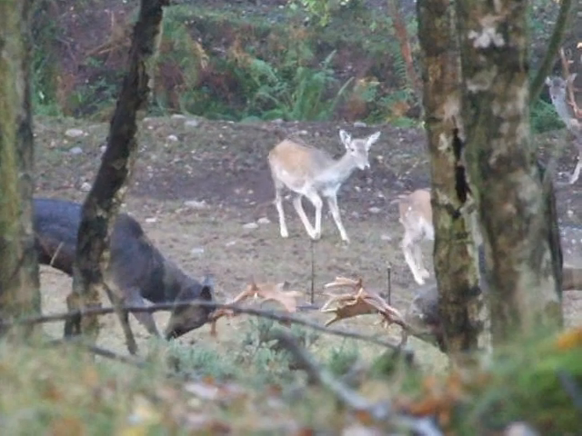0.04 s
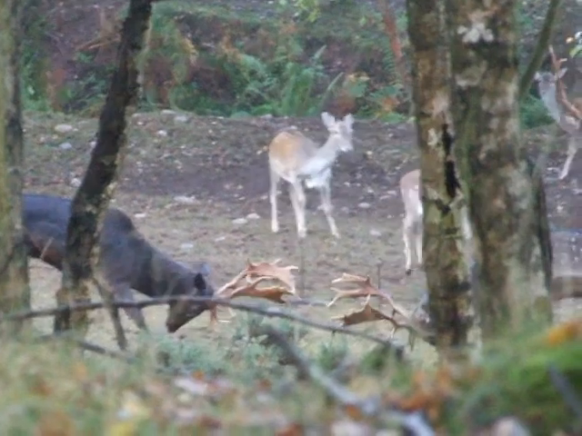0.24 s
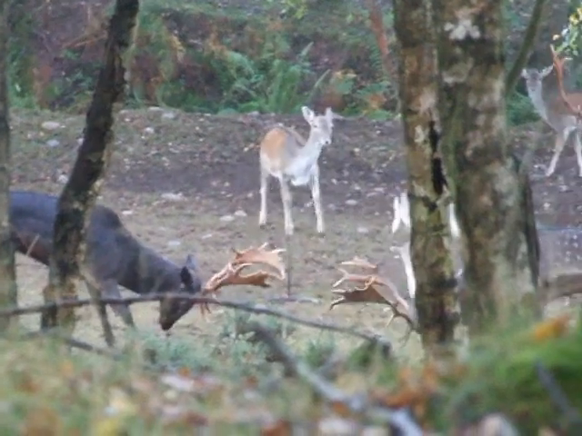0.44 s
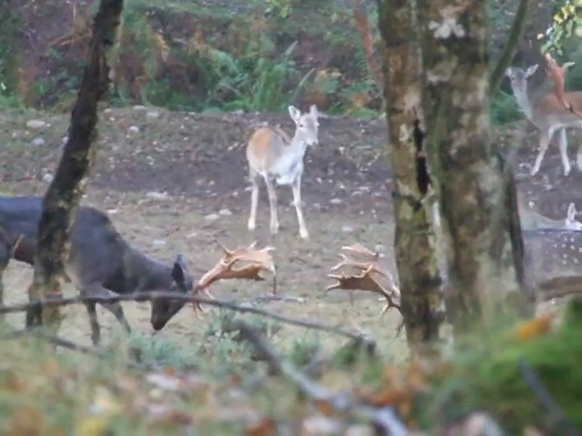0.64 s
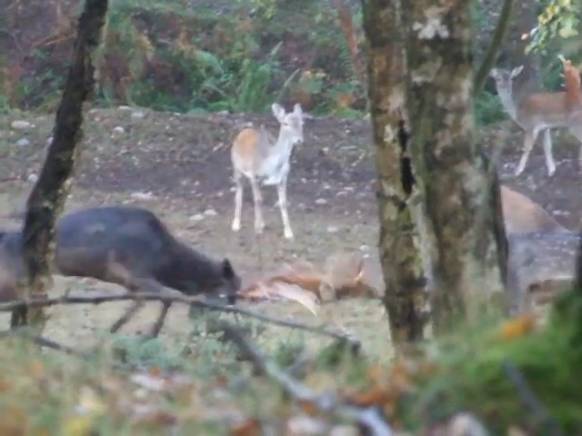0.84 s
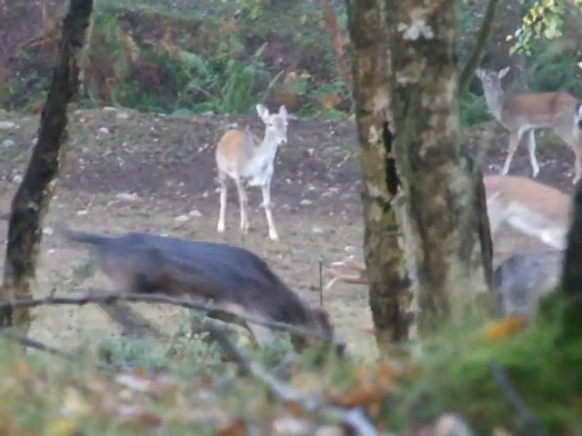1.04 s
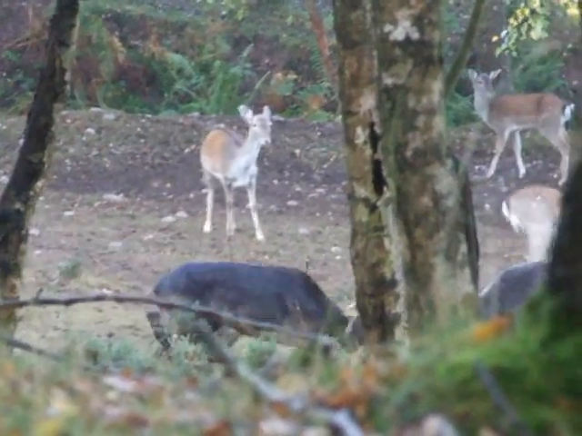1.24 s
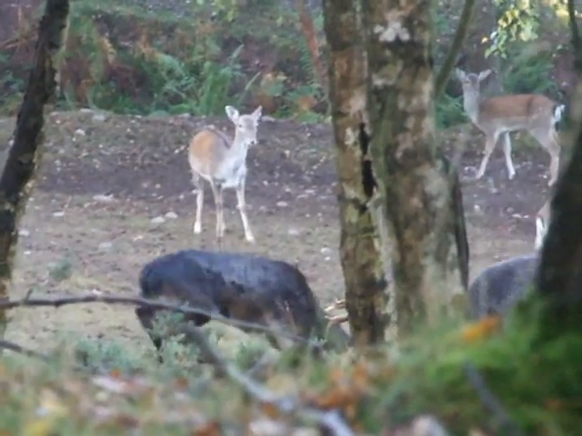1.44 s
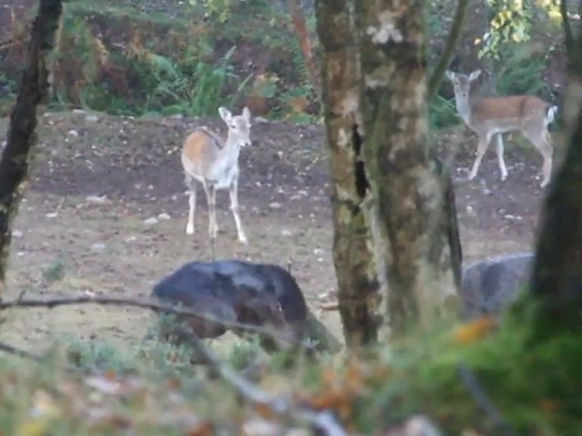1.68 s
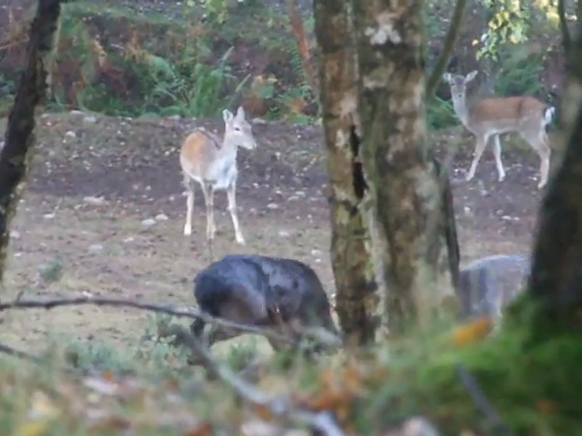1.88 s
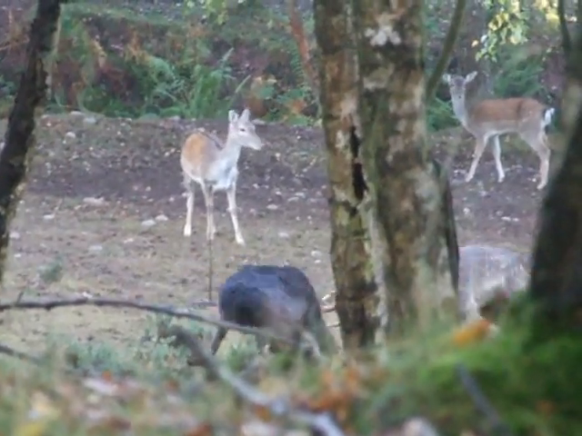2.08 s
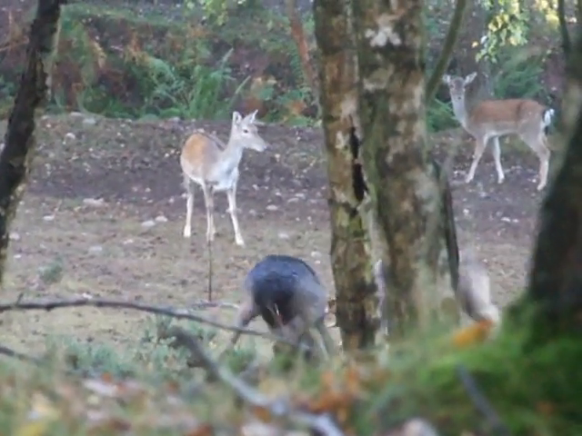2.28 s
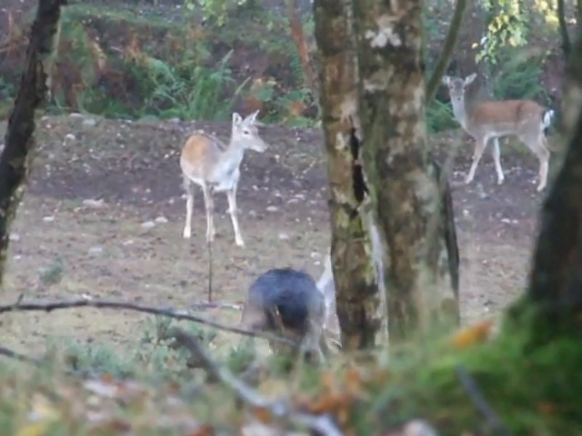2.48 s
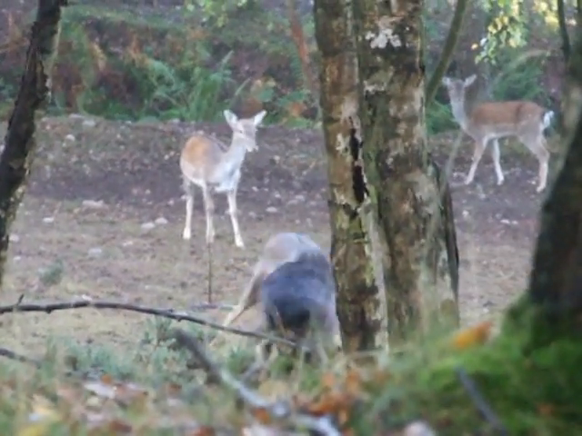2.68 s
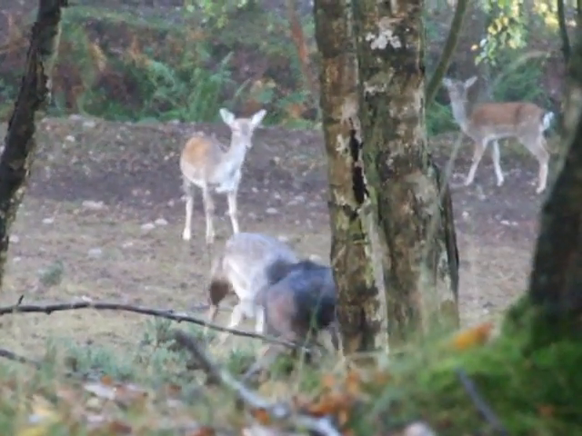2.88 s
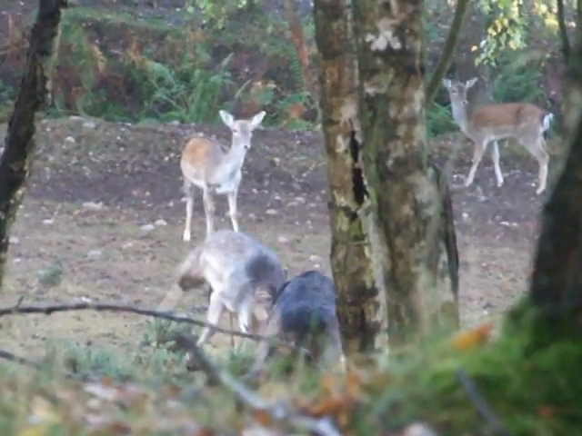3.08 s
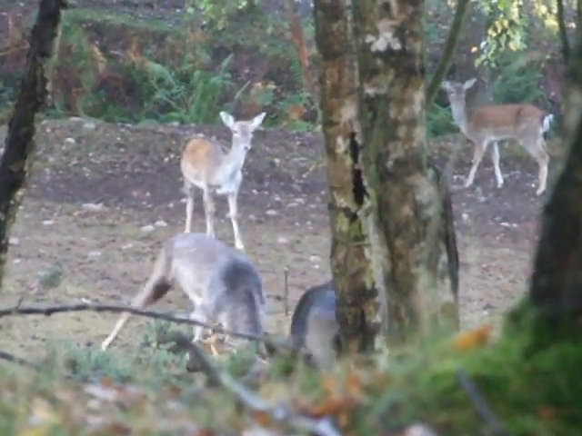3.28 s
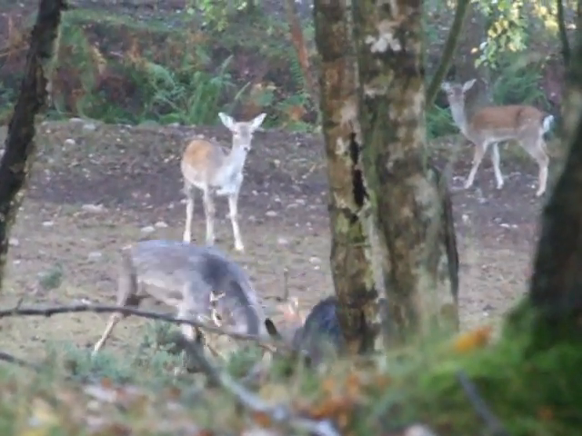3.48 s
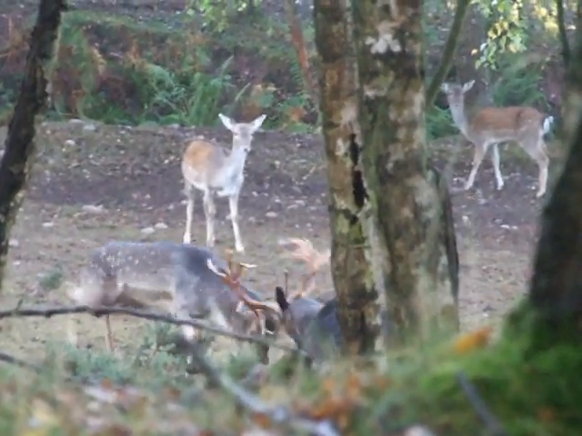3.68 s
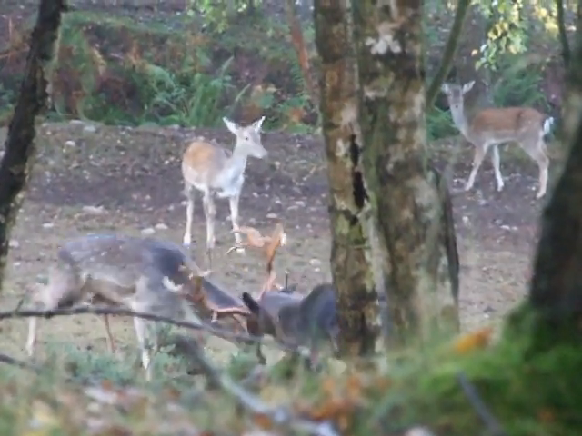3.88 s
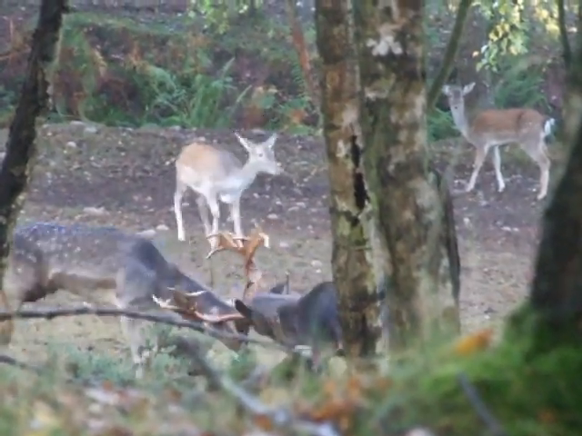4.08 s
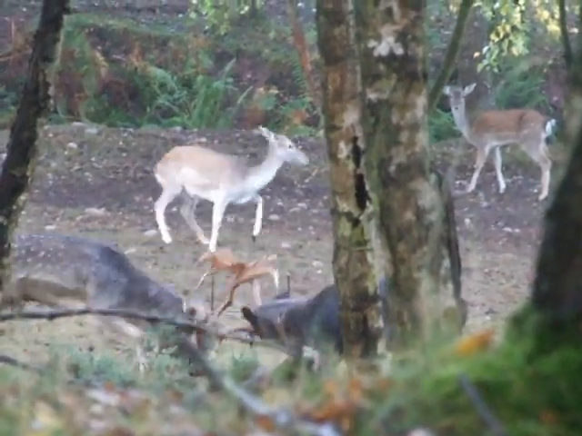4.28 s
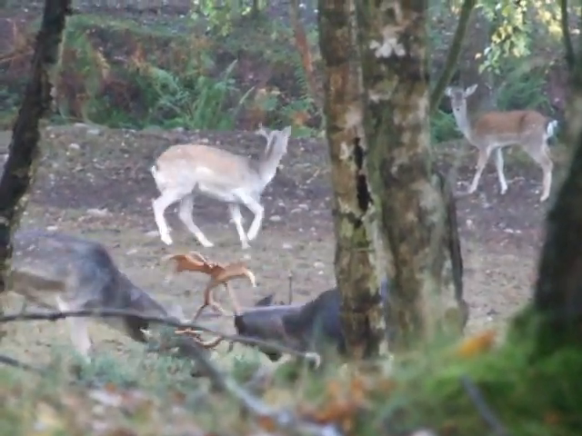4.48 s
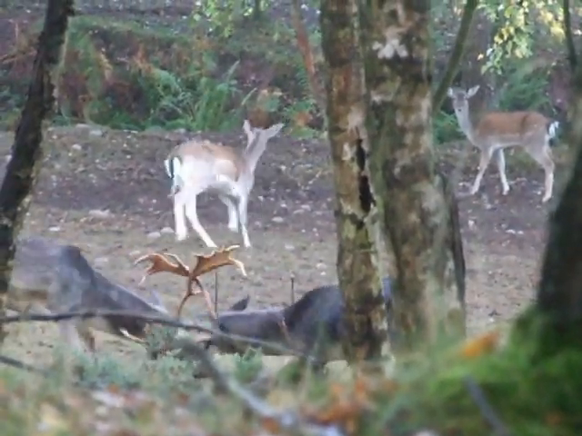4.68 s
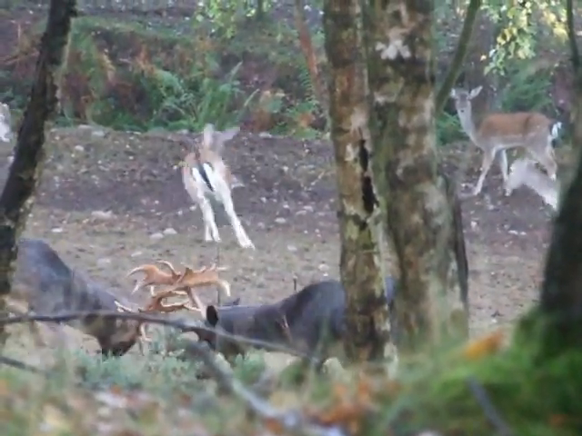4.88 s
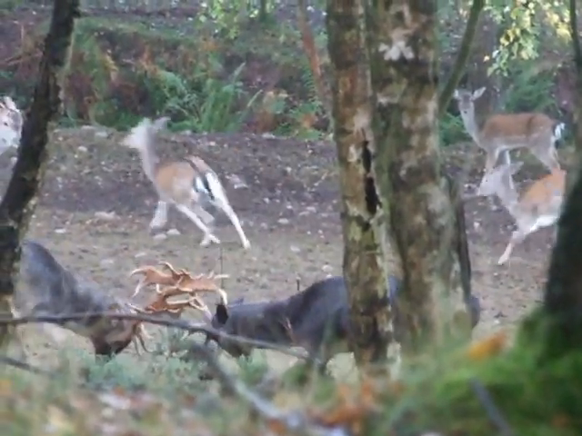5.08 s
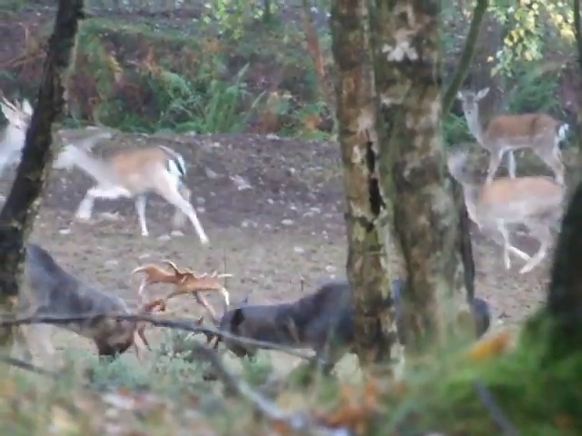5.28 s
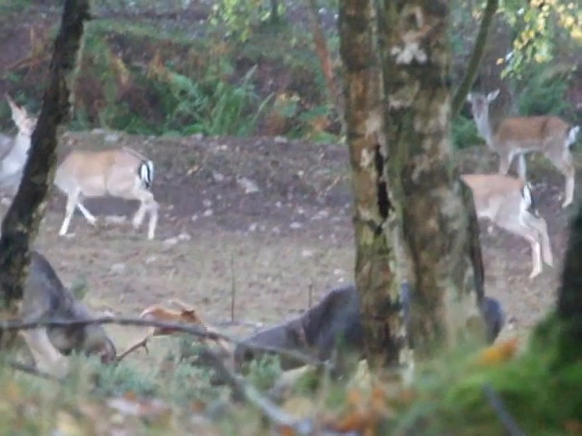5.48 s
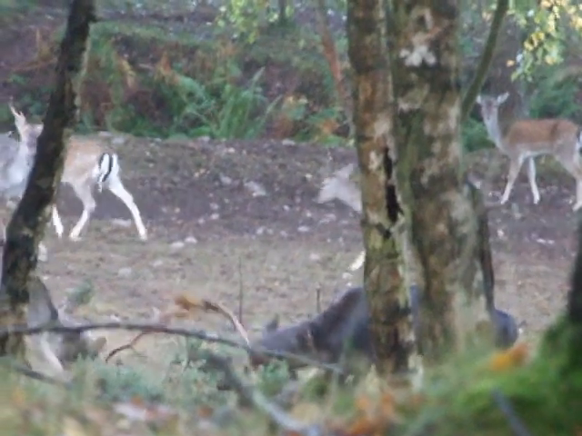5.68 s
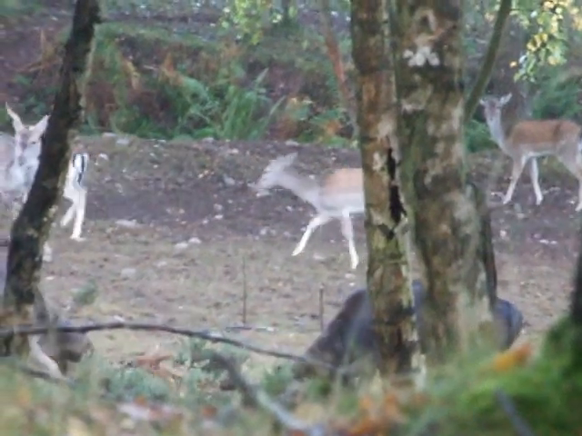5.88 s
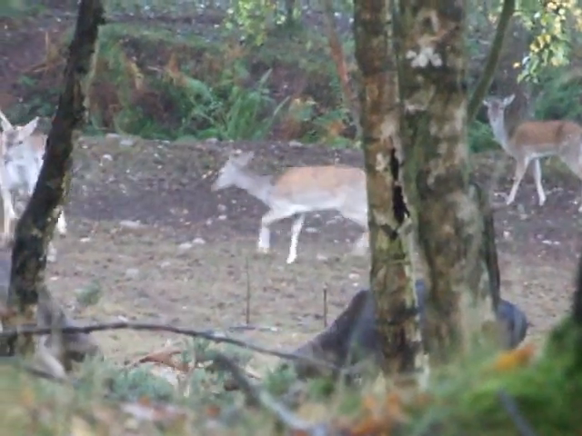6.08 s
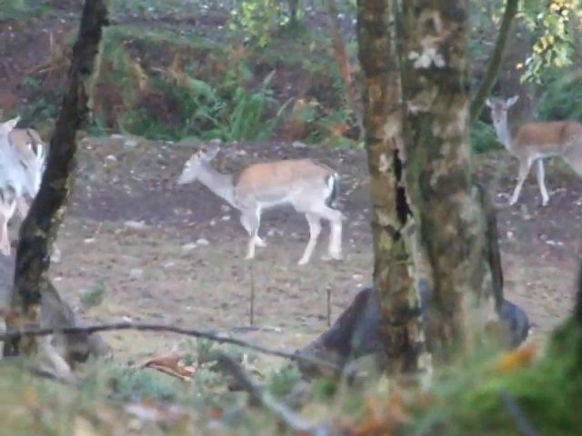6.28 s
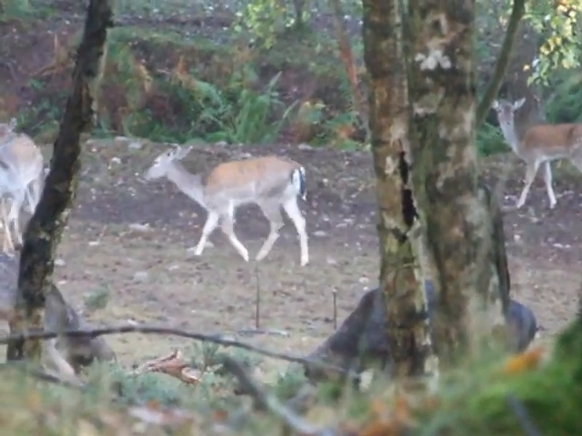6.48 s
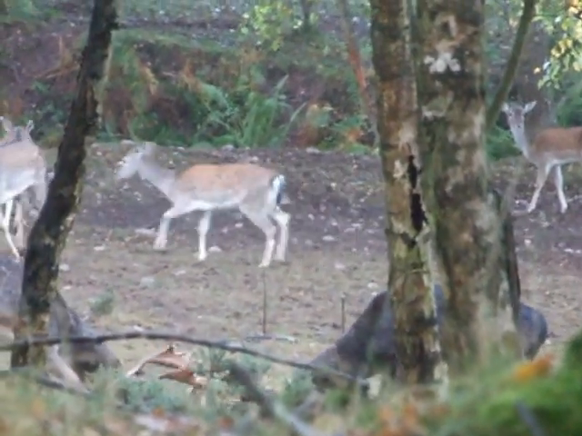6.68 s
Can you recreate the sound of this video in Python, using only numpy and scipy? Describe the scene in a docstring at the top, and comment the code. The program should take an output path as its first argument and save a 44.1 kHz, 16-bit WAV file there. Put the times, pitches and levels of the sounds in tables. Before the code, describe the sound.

Antlers of two fighting deer clack and clatter irregularly, with low rattling grunts and scuffing hooves, at the edge of a wood.

```python
"""Fallow bucks fighting

Two bucks fight some way off at a wood's edge. Antlers clack, skid and lock; trunks scatter each clash.
Between blows, slack vocal folds give low rattling grunts, so slow that single pulses are heard.
Hooves scuff dry ground and snap twigs, a small bird calls thinly, and the air hisses softly."""
import sys
import numpy as np
from scipy import signal
from scipy.fft import rfft, irfft, next_fast_len
from scipy.io import wavfile
from scipy.ndimage import map_coordinates

SR = 44100
rng = np.random.default_rng(int(sys.argv[2]) if len(sys.argv) > 2 else 0)


def bounce(signal):
    """Save signal as a 16-bit WAV file at the path given by the first command-line argument."""
    frames = np.transpose(np.atleast_2d(signal))
    limited = np.clip(frames, -1, 1)
    pcm = np.round(limited * 32767).astype(np.int16)
    wavfile.write(sys.argv[1], SR, pcm)


N = 297234

# Air spectrum: freq_hz, gain_db
AIR_SPECTRUM = [(20, -7.5), (35, -10), (70, 0.5), (130, -5), (240, -6.5), (350, -11), (650, -7.5),
                (1300, -11), (2100, -14), (3100, -16.5), (4500, -14), (7400, -17.5), (10200, -40.5)]
# Hoof scuffing envelope: time_s, gain_db
SCUFF_ENVELOPE = [(0.0, -36.5), (1.05, -62), (1.2, -32), (1.93, -37), (5.2, -44.5), (5.78, -28.5),
                  (6.03, -38.5), (6.74, -38)]
# Dry litter spectrum: freq_hz, gain_db
LITTER_SPECTRUM = [(300, -16), (1000, -4), (2200, -4.5), (3500, -7), (6000, -6.5), (8000, -17.5),
                   (10000, -33)]
# Bird calls: start_s, length_s, pitch_hz, gain_db
PEEPS = [(.12, 0.16, 4100, -64), (0.528, 0.34, 4570, -62.5), (0.688, 0.093, 4400, -58),
         (2.864, 0.39, 4500, -62), (5.422, 0.26, 4480, -55)]
# Decay of the wood's echo: freq_hz, t60_s
WOOD_DECAY = [(200, 0.25), (900, 0.75), (2100, 0.64), (5500, 0.61), (9000, 0.4)]
# Antler contacts: start_s, level_db (over 10 ms), tine_hz, depth (0 tip, 1 base), echo_db
CLASHES = [(0.2798, -27.5, 4280, 0.46, 2.5), (1.0103, -32.5, 6570, 0.43, 3.5), (1.065, -33.5, 4330, .6, -4),
           (1.078, -29, 6440, 0, 6), (1.0998, -28, 6200, 0.94, -6), (1.111, -26.5, 5650, 0.68, -3),
           (1.1211, -25.5, 5320, 0.46, 1), (1.3453, -34, 4970, 1, -5), (1.58, -30.5, 4380, 0.58, -3.5),
           (1.7863, -25, 6224, 0.63, -0.5), (2.431, -37.5, 7000, 0.079, -12), (2.454, -37.5, 4340, 0, -5.5),
           (2.49, -38.5, 4300, .2, -3), (2.627, -32.5, 4848, 0.88, 1), (3.157, -40, 4500, 1, -6),
           (3.3253, -37, 3900, 0.69, 8), (3.3597, -26, 6000, 0.45, -13), (3.375, -29.5, 5440, 0.99, -1.5),
           (3.392, -34, 5860, 1, -2.5), (3.581, -38.5, 4670, 0, -14), (3.756, -34, 6594, 0.36, 1),
           (4.006, -39, 5170, 0.015, -5), (4.2559, -31, 4250, 0.66, -5.5), (4.46, -41.5, 5220, .4, 3.5),
           (4.7504, -34, 4302, 0.49, -4.5), (5.402, -23, 6190, 0.29, -3), (5.6313, -29.5, 5900, 0.52, -3.5),
           (5.7697, -36, 5254, .4, 1.5), (5.8064, -22.5, 6210, 0, -1), (6.2372, -29.5, 5950, 0.047, -3.5),
           (6.3646, -35.5, 6125, 0.48, 0), (6.406, -34, 5888, 0.11, -11)]
# Bare contact spectrum: freq_hz, gain_db
CRACK_SPECTRUM = [(100, -35), (330, -5.5), (800, -26), (1500, -10), (3200, -9.5), (6500, -2), (8000, -16.5),
                  (10000, -23)]
# Resonances of the antlers' broad palms: centre_hz, width_hz, gain_db
PALM_MODES = [(1795, 70, 5.5), (2255, 46, 0), (2830, 91, 2), (3660, 240, -2.5), (4250, 220, 1.5),
              (5800, 1700, -2.5), (6560, 210, -6.5), (7750, 280, -20)]
# Grunts: start_s, length_s, gain_db, mouth_db (opening), mouth_hz (resonance)
GRUNTS = [(0.776, 0.21, -45, -2, 1790), (1.311, 0.24, -40, 0, 1150), (1.619, 0.15, -45.5, -9, 1170),
          (2.422, 0.3, -38.5, -1, 1150), (3.555, 0.14, -46, -8, 1156), (3.749, 0.21, -47.5, 1.5, 1195),
          (4.301, 0.29, -39.5, -4.5, 1149), (4.992, 0.38, -40.5, -1, 1151), (5.617, 0.21, -44.5, -1, 1136),
          (5.872, 0.17, -44, 3.5, 1170), (6.251, 0.25, -43.5, -1, 1087), (6.49, 0.21, -42, -1, 1090)]
# Hard pops in the rattle: start_s, level_db (over 10 ms)
POPS = [(1.3798, -33.5), (1.4635, -34), (1.4954, -33.5), (2.5556, -34.5), (5.1558, -36), (5.2073, -34.5),
        (5.2952, -38.5), (6.0154, -36), (6.0401, -36)]
# Low throat resonances: centre_hz, width_hz, gain_db
THROAT_MODES = [(166, 98, -5.5), (236.4, 49.3, 1.5), (419.4, 73, -9), (664, 112, -15.5)]
# High, open-mouth resonances: centre_hz, width_hz, gain_db
MOUTH_MODES = [(1390, 280, -5.5), (2023, 206, -2.5), (2530, 550, -2.5), (3450, 5000, -11)]
# Muffling by flesh: freq_hz, gain_db
FLESH_SPECTRUM = [(2700, 0), (4200, -8), (9000, -17)]


def amp(db):
    return 10 ** (np.asarray(db) / 20)


def unit_rms(x):
    return x / np.sqrt(np.mean(x ** 2) + 1e-20)


def unit_blow(x):
    """Scale to the energy of 10 ms at rms 1."""
    return x / np.linalg.norm(x) * np.sqrt(SR / 100)


def log_interp(points, hz):
    knots_hz, values = np.transpose(points)
    return np.interp(np.log(hz + 1), np.log(knots_hz + 1), values)


def wobble(rate_hz):
    """Smooth random curve, N samples."""
    knots = rng.standard_normal(int(N * rate_hz / SR) + 4)
    return map_coordinates(knots, [np.arange(N) * rate_hz / SR])


def filtered(x, response):
    size = next_fast_len(len(x) + SR // 8)
    return irfft(rfft(x, size) * response(np.fft.rfftfreq(size, 1 / SR)), size)[:len(x)]


def resonate(x, modes):
    """Parallel band-passes of alternating sign."""
    return filtered(x, lambda hz: sum(
        (-1) ** k * amp(db) * 1j * hz * width_hz / (centre_hz ** 2 - hz ** 2 + 1j * hz * width_hz)
        for k, (centre_hz, width_hz, db) in enumerate(modes)))


def coloured(x, spectrum):
    return filtered(x, lambda hz: amp(log_interp(spectrum, hz)))


def add(track, start_s, sound):
    start = max(round(start_s * SR), 0)
    part = track[start:start + len(sound)]
    part += sound[:len(part)]


def contact(skid_db, t60_s):
    """Sharp push, then dying chatter."""
    t = np.arange(SR // 16) / SR
    chatter = rng.standard_normal(len(t)) * amp(-60 * t / t60_s)
    force = amp(skid_db) * chatter / np.linalg.norm(chatter)
    force[0] = 1
    return np.pad(force, (16, 0))  # room for the click's rise


def air():
    """Steady rumble and hiss of the open wood."""
    return amp(-46 + 0.26 * wobble(2.7)) * unit_rms(coloured(rng.standard_normal(N), AIR_SPECTRUM))


def hooves(grains_per_s=1400):
    """Shoving hooves crush dry litter: fine, uneven crackle."""
    grains = rng.standard_normal(N) * (rng.random(N) < grains_per_s / SR)
    scuff_db = np.interp(np.arange(N) / SR, *np.transpose(SCUFF_ENVELOPE))
    return amp(scuff_db - 16.5 + 0.61 * wobble(28)) * unit_rms(coloured(grains, LITTER_SPECTRUM))


def twigs(snaps_per_s=14, spread_db=3.5):
    """Twigs snap at random, louder where hooves shove harder."""
    out = np.zeros(N)
    for when, size in rng.random((int(snaps_per_s * N / SR), 2)):
        start_s = when * N / SR
        scuff_db = np.interp(start_s, *np.transpose(SCUFF_ENVELOPE))
        snap = unit_blow(coloured(contact(skid_db=5.5, t60_s=0.033), LITTER_SPECTRUM))
        add(out, start_s, amp(scuff_db - 8 + spread_db * (2 * size - 1)) * snap)
    return out


def bird():
    """Thin, wavering peeps, smeared by the trees."""
    out = np.zeros(N)
    for start_s, length_s, pitch_hz, gain_db in PEEPS:
        count = int(length_s * SR)
        wavering_hz = pitch_hz * (1 + 0.0335 * wobble(220)[:count])
        tone = np.sin(2 * np.pi * np.cumsum(wavering_hz) / SR)
        peep = unit_rms(signal.windows.tukey(count, 0.5) * tone)
        add(out, start_s, amp(gain_db + 7) * trunk_echo(peep, build_s=0.0082))
    return out


def trunk_echo(x, build_s):
    """Scatter builds from trunk to trunk, then dies in uneven clumps."""
    hz, t, noise = signal.stft(rng.standard_normal(SR * 3 // 4), SR, nperseg=256)
    clumps_db = 2.2 * rng.standard_normal(len(t))
    decay_db = 60 * t / log_interp(WOOD_DECAY, hz)[:, None]
    tail = signal.istft(noise * amp(clumps_db - decay_db), SR, nperseg=256)[1]
    tail *= 1 - np.exp(-np.arange(len(tail)) / SR / build_s)
    return signal.fftconvolve(x, tail / np.linalg.norm(tail))


def antlers(palm_spread_db=12):
    """Contacts ring a thick beam and a thin tine; bone damps both within milliseconds."""
    out = np.zeros(N)
    for start_s, level_db, tine_hz, depth, echo_db in CLASHES:
        beam_db = np.interp(depth, [0, 1], [-26, 19.5])
        beam_hz = 2600 - 720 * depth ** 3
        skid_db = np.interp(depth, [0, 1], [-1, 7.5])  # tips glance, bases grind
        force = contact(skid_db, t60_s=0.039)
        beam = unit_rms(resonate(force, [(beam_hz, 340, 0), (beam_hz * 1.63, 450, -7)]))
        tine = unit_rms(resonate(force, [(tine_hz * 0.932, 750, 0), (tine_hz * 1.167, 850, -1)]))
        ring = unit_rms(amp(beam_db) * beam + tine)
        crack = unit_rms(coloured(force, CRACK_SPECTRUM))
        add(out, start_s, amp(level_db) * unit_blow(ring + amp(-3) * crack))
        # Trunks return sound sent in all directions, including the palms' hollow ring.
        push = contact(skid_db=-23, t60_s=0.011)
        modes = [(hz, width_hz, db + rng.normal(0, palm_spread_db)) for hz, width_hz, db in PALM_MODES]
        palm = resonate(push, modes)
        for part, part_db in (ring, -5), (coloured(push, CRACK_SPECTRUM), -4), (palm, -6):
            echo = trunk_echo(unit_blow(part), build_s=0.0076)
            add(out, start_s, amp(level_db + echo_db + part_db) * echo)
    return out


def grunts(slap_hz=30, rise_hz_per_s=18, jitter_s=0.002, edge_db=-9.5):
    """Slack vocal folds slap in a quickening rattle that swells and falls."""
    out = np.zeros(N)
    pop_times_s = np.transpose(POPS)[0]
    for start_s, length_s, gain_db, mouth_db, mouth_hz in GRUNTS:
        progress = np.linspace(0, 1, int(length_s * SR))
        cycles = np.cumsum(slap_hz + rise_hz_per_s * length_s * progress) / SR
        cycle_starts = np.flatnonzero(np.diff(np.floor(cycles), prepend=-1))
        effort = amp(edge_db * (2 * progress - 1) ** 2)
        folds = np.zeros(len(progress) + SR // 12)
        for i in cycle_starts:
            slap = effort[i] * amp(rng.normal(0, 2.3)) * contact(skid_db=1, t60_s=0.018)
            offset_s = i / SR + jitter_s * rng.normal()
            if np.abs(pop_times_s - start_s - offset_s).min() > 0.5 / slap_hz:  # gaps for pops
                add(folds, offset_s, slap)
        voice = amp(gain_db - 7) * throat(folds, mouth_db, mouth_hz)
        add(out, start_s, voice)
        add(out, start_s, amp(0.5) * trunk_echo(voice, build_s=0.0036))
    return out


def throat(folds, mouth_db, mouth_hz):
    """Fold slaps ring the long throat; an open mouth adds high resonances."""
    low = unit_rms(resonate(folds, THROAT_MODES))
    high = unit_rms(resonate(folds, [(mouth_hz, 65, 2)] + MOUTH_MODES))
    return coloured(low + amp(mouth_db) * high, FLESH_SPECTRUM)


def throat_pops():
    """Single hard slaps break out of the rattle."""
    out = np.zeros(N)
    for start_s, level_db in POPS:
        slap = contact(skid_db=-4, t60_s=0.02)
        pop = amp(level_db) * unit_blow(throat(slap, mouth_db=7, mouth_hz=1200))
        add(out, start_s, pop)
        add(out, start_s, amp(-4.5) * trunk_echo(pop, build_s=0.0021))
    return out


def scene():
    """Fight and surroundings, mono."""
    return (antlers() + grunts() + throat_pops() + hooves() + twigs() + bird() + air())[None]


def record(dry):
    """Dulled top octave, steep low-pass."""
    cutoff_hz = 10384
    dulled = coloured(dry[0], [(7000, -0.5), (8500, 1.5), (9600, -6), (10400, -27)])
    return filtered(dulled, lambda hz: 1 / np.sqrt(1 + (hz / cutoff_hz) ** 80))[None]


dry = scene()
out = record(dry)
bounce(out)
```